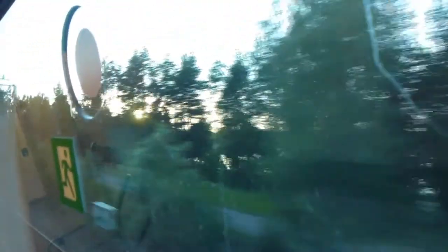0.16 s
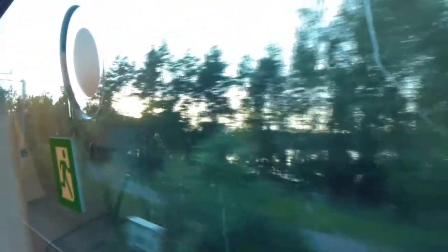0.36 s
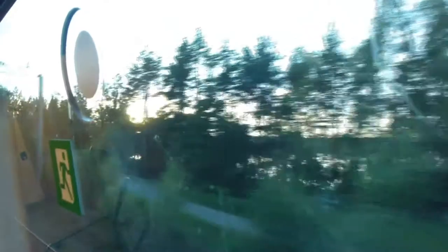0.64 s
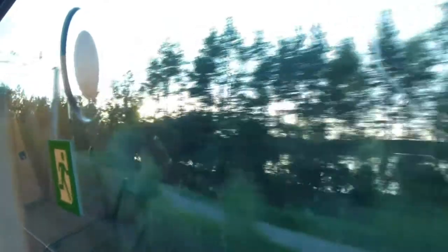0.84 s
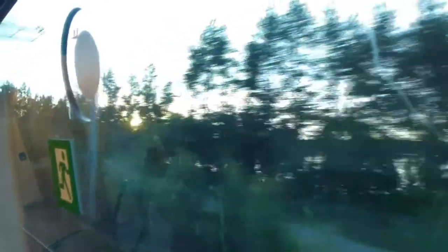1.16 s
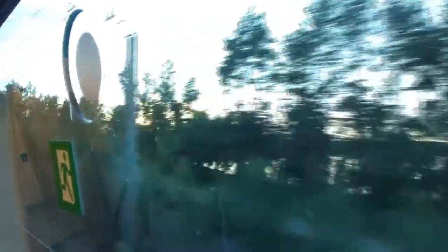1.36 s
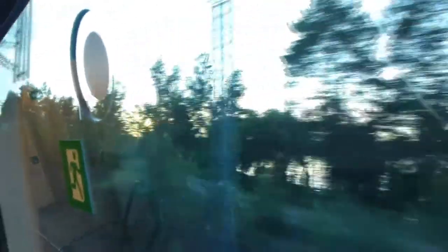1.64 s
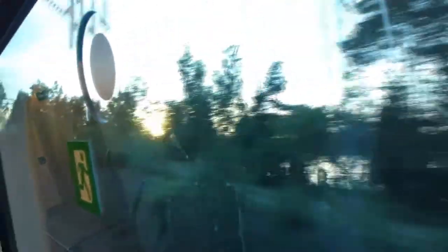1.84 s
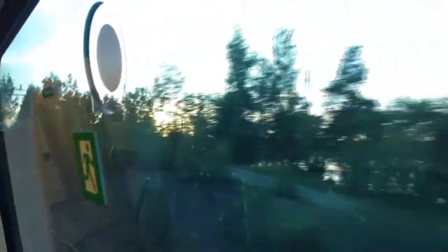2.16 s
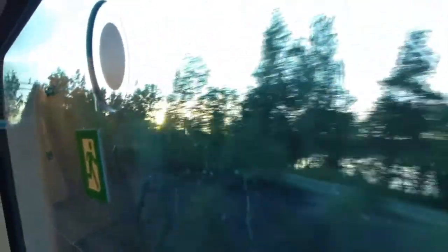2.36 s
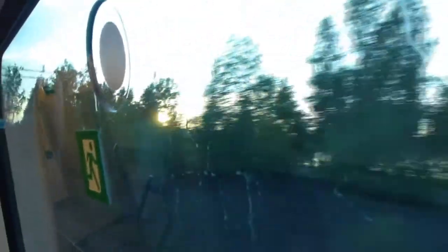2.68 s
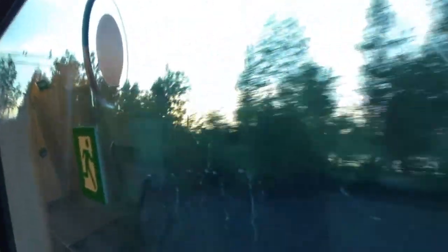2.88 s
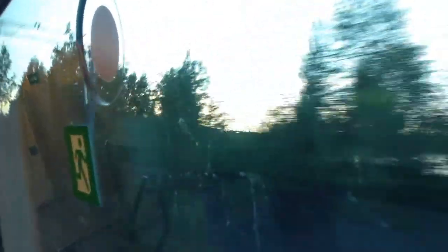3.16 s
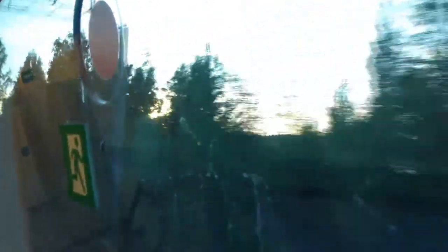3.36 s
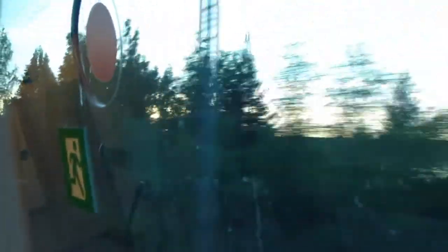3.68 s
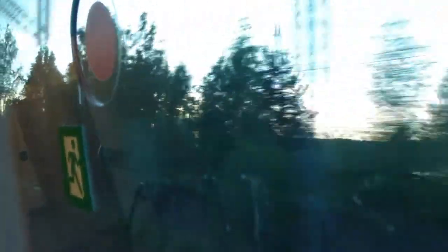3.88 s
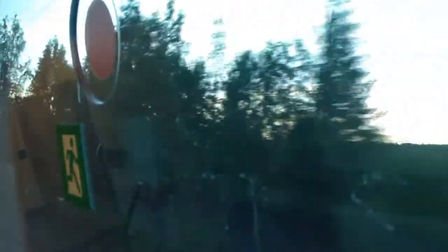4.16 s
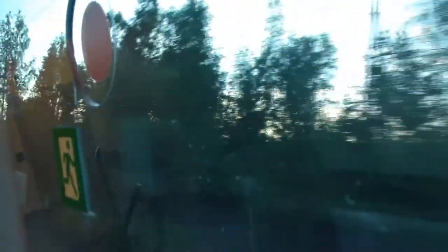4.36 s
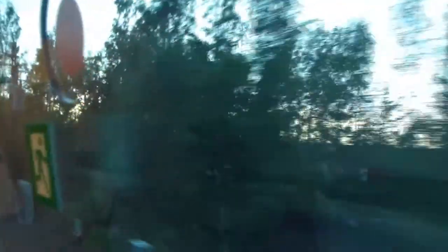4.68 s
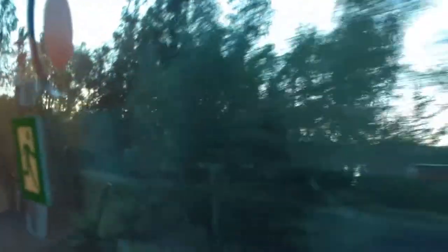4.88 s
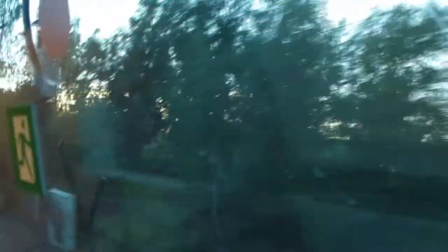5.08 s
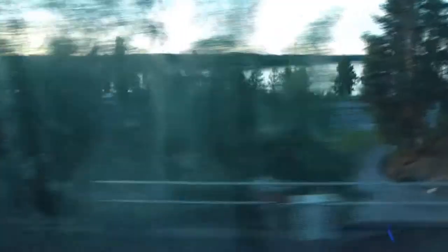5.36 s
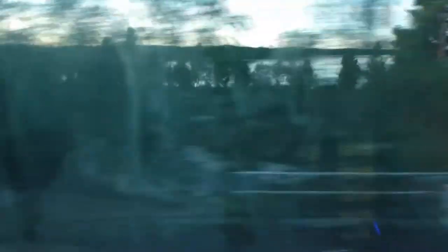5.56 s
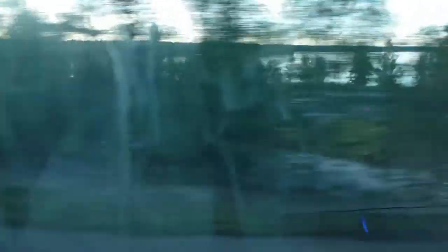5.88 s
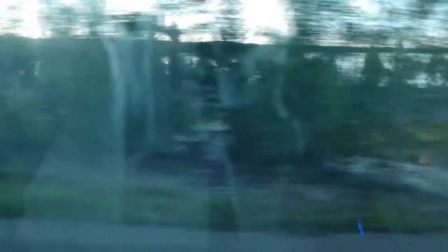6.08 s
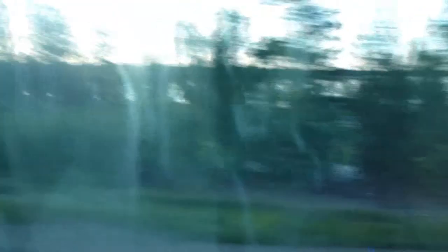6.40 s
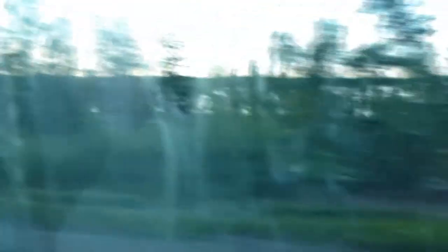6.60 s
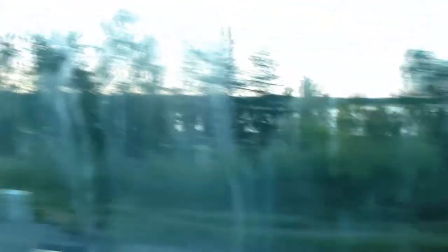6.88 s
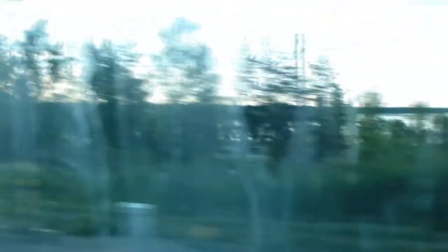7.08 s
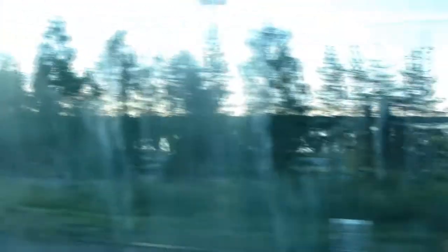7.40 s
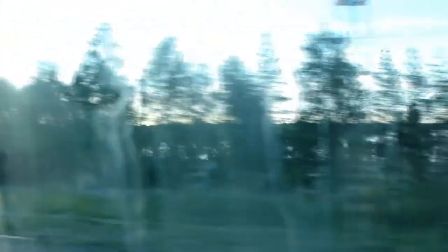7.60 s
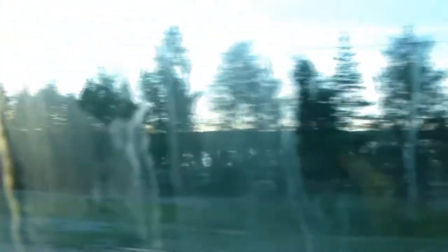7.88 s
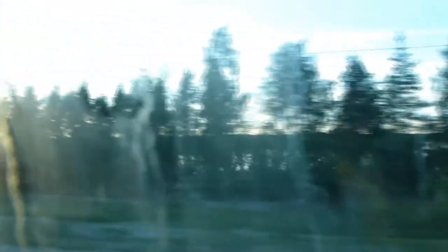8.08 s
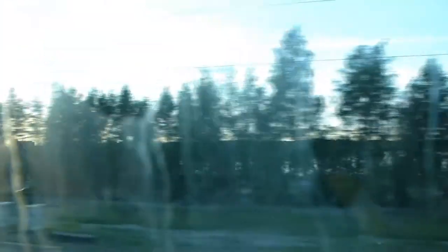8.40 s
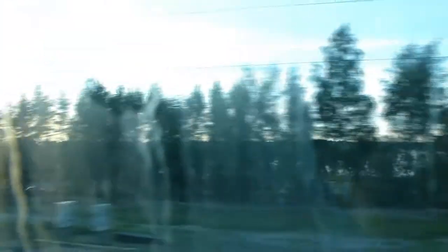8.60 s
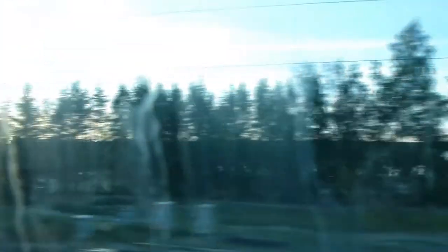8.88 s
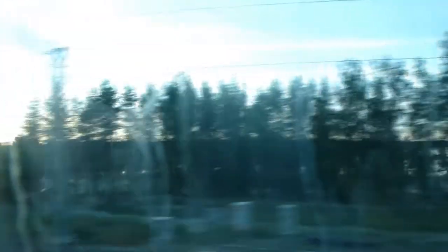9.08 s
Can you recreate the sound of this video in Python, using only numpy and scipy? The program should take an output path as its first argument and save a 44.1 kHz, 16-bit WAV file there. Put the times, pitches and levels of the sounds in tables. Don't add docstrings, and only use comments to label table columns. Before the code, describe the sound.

A small handheld stereo camera in a train cabin picks up dull rolling rumble, wavering with bumps, and hissing window seals. Thin wheel hums swell briefly; plastic clicks and soft fingertip taps occur very close. After about five seconds everything drops out for a quarter second, then the faster ride enters abruptly, with stronger rumble and air rush, smoother and almost free of handling noise.

```python
import sys
import numpy as np
from scipy import signal
from scipy.fft import rfft, irfft, next_fast_len
from scipy.io import wavfile
from scipy.ndimage import uniform_filter1d, map_coordinates

SR = 44100
rng = np.random.default_rng(int(sys.argv[2]) if len(sys.argv) > 2 else 0)


def wav_out(sig):
    wavfile.write(sys.argv[1], SR, np.round(np.clip(np.atleast_2d(sig).T, -1, 1) * 32767).astype(np.int16))


def boost(x):
    u = np.asarray(x, float) / 20
    return 10 ** u


N = 407925
TOP_HZ = 15780

# start in seconds, end in seconds.
STRETCHES = [
    (-1, 5.2935),
    (5.5212, 10),
]
# middle in seconds, half length in seconds,
# level change in dB.
SHADES = [(.02, .06, -4), (.87, 0.086, -2.5), (2.02, 0.072, -5.5), (3.09, 0.021, -12.5),
          (3.42, 0.024, -1.5), (3.61, 0.022, -3), (4.23, 0.029, -1.5), (4.38, 0.044, -6.5),
          (4.55, 0.07, -2), (4.85, .08, -2)]


def unit(x):
    return x / np.sqrt(np.mean(x ** 2) + 1e-20)


def along(points, hz):
    f, v = np.transpose(points)
    return np.interp(np.log(hz + 1), np.log(f + 1), v)


def curve_of(rows):
    s, v = np.transpose(rows)
    return np.interp(np.arange(N) / SR, s, v)


def share(curve, rows, part_followed):
    centre = np.mean([row[1] for row in rows])
    return centre + part_followed * (curve - centre)


def swells(rows):
    t = np.arange(0, N / SR, 1 / 500)
    total_db = sum(db * np.exp(-((t - s) / half) ** 2) for s, half, db in rows)
    return np.interp(np.arange(N) / SR, t, total_db)


def wobble(rate):
    return map_coordinates(rng.standard_normal(N // 100), [np.arange(N) * rate / SR], order=1)


def filtered(x, response):
    m = next_fast_len(x.shape[-1] + 8192)
    return irfft(rfft(x, m) * response(np.fft.rfftfreq(m, 1 / SR)), m)[..., :x.shape[-1]]


def modes(table, f):
    total = 0
    for k, (centre, wide, db) in enumerate(table):
        total = total + (-1) ** k * boost(db) * 1j * f * wide / (centre * centre - f * f + 1j * f * wide)
    return total


def rush(part, spectrum, lifts, lo_hz, hi_hz, patchy_db):
    # frequency in Hz, side minus mid in dB.
    alike = [
        [(60, -25), (95, -27.5), (150, -41.5), (240, -50), (380, -23.5), (600, -20), (950, -13), (1500, -2.5),
         (2380, -7.5), (3770, -0.5), (5980, -2.5), (9470, -1.5), (15000, 3)],
        [(60, -20), (95, -25), (150, -31), (240, -49), (380, -25), (600, -20.5), (950, -7), (1500, -4.5),
         (2380, -3.5), (3770, 0), (5980, -3.5), (9470, -0.5), (15000, 2)],
    ]
    start, stop = np.clip(np.round(np.array(STRETCHES[part]) * SR), 0, N).astype(int)
    z = signal.stft(rng.standard_normal((2, stop - start)), nperseg=1024)[2]
    field = uniform_filter1d(rng.standard_normal(z.shape[1:]), size=12, axis=0)
    field = uniform_filter1d(field, size=6, axis=1)
    pair = signal.istft(z * boost(patchy_db * unit(field)), nperseg=1024)[1][:, :stop - start]
    walls = rng.standard_normal(SR // 40)

    def colour(hz):
        db = along(spectrum, hz)
        db = db + sum(lift / (1 + (2 * (hz - c) / wide) ** 2) for c, wide, lift in lifts)
        db = db + 2.0 * np.interp(hz / 20, np.arange(len(walls)), walls) * np.clip(hz / 900, 0, 1)
        band = 1 / np.sqrt((1 + (lo_hz / (hz + 1)) ** 12) * (1 + (hz / hi_hz) ** 12))
        return (hz < TOP_HZ) * band * boost([db, db + along(alike[part], hz)])

    mid, side = filtered(pair, colour)
    power = uniform_filter1d(uniform_filter1d(mid ** 2, size=SR // 12), size=SR // 12)
    steady = np.sqrt(np.abs(power))
    return np.pad(np.array([mid + side, mid - side]) / steady, ((0, 0), (start, N - stop)))


def rolling(part):
    # frequency in Hz, level in dB per Hz.
    roll_tone = [
        [(15, -78.5), (25, -37.5), (48, -32.5), (67, -20.5), (97, -8), (191, -7.5), (257, 0), (426, -10.5),
         (563, -13), (798, -15.5), (870, -16), (949, -18.5), (1600, -20.5), (2080, -66), (3520, -120)],
        [(15, -84), (25, -37), (48, -38), (60, -28), (108, -12.5), (145, -15.5), (240, -1.5), (281, -6),
         (328, -7.5), (670, -11), (949, -15.5), (1170, -18.5), (1600, -20.5), (2080, -50), (3520, -120)],
    ]
    # frequency in Hz, width in Hz, lift in dB.
    cabin_modes = [(111.8, 4.5, 8), (173, 32, 3), (222.8, 6.3, 4.5), (251.3, 14, 3), (352, 110, 5.5),
                   (467.3, 12, 5), (705, 25, 0.5)]
    # time in seconds, level in dB.
    track = [
        [(0, -48), (.25, -42.5), (.9, -43.5), (1.15, -42.5), (1.5, -42.5), (1.87, -40), (2.08, -47.5),
         (2.75, -42.5), (3.2, -43), (3.6, -46.5), (4.2, -45.5), (4.7, -45), (5.28, -43)],
        [(5.52, -36.5), (6.15, -36.5), (7.0, -38), (8.1, -36), (8.45, -37.5)],
    ]
    # middle in seconds,
    # half length in seconds, boom in dB, share reaching the rail (a ratio).
    jolts = [(.11, 0.06, 2.5, .3), (0.305, 0.035, 7.5, 1.1), (.37, .025, 4, .3), (0.418, 0.02, 7, 1.1),
             (.447, .01, 9, .5), (.474, .011, 11, .3), (.56, .03, 1, .2), (0.757, 0.024, 5, 0.24),
             (1.294, 0.096, 3.5, .1), (1.87, 0.39, 0.5, .1), (2.43, .04, 3.5, .1), (2.626, 0.023, 2.5, 0.2),
             (2.695, 0.033, -5, 0.37), (3.062, 0.024, 4.5, 0.98), (3.262, 0.026, 12, .05),
             (3.342, 0.05, 7, 0.26), (3.447, .03, 7.5, .4), (3.558, 0.049, 8.5, .1), (3.81, 0.084, 5, 0.4),
             (4.007, 0.026, 2.5, .1), (4.195, 0.066, 5, .05), (4.6, 0.24, -3, .1), (4.9, .07, 2.5, 0.44),
             (5.216, 0.061, 3, .5), (5.685, .08, 2.5, .1), (5.818, 0.1, -4, 0.18), (6.213, 0.078, 2.5, .05),
             (6.323, 0.069, -2.5, .05), (6.52, 0.035, 1.5, .1), (6.987, 0.043, 5, .05),
             (7.716, 0.052, 3.5, 0.22), (7.87, 0.083, -3, .05), (8.155, 0.024, 5.5, 0.64),
             (8.31, 0.17, -2, .3), (8.81, 0.11, 1.5, 0.37)]
    # middle in seconds, lift in dB.
    thuds = [(.43, 7), (.6, 6.5), (.76, 3), (.97, -0.5), (1.32, -5), (2.0, 7.5), (2.49, 4.5), (2.93, 1),
             (3.05, 5), (3.2, 7), (3.27, -6), (3.34, 11), (3.57, 4.5), (3.69, -2), (3.93, 6), (4.17, 6),
             (4.89, 4), (5.12, 4.5), (5.28, 7), (5.69, -3), (5.83, 2), (6.32, 1), (6.98, -3), (7.22, -3),
             (7.86, -5), (8.15, 2.5)]
    # middle in seconds, half length in seconds, lift in dB.
    rail_rings = [(1.02, 0.15, 7), (1.82, .05, 4), (3.5, 0.068, 4), (3.8, 0.13, 8), (5.2, 0.073, 4),
                  (7.0, .08, 4)]

    def noise(lo_hz, hi_hz):
        return rush(part, roll_tone[part], cabin_modes, lo_hz, hi_hz, patchy_db=[1.5, 1.1][part])

    track_db = curve_of(track[part])
    sway_db = [1.2, .6][part] * wobble(14) + 0.21 * swells(SHADES)

    under_db = share(track_db, track[part], 0.18) + [-4, -11][part]
    under_db = under_db + swells([(s, 0.07, db) for s, db in thuds])
    under = boost(under_db + sway_db) * noise(12, 197.0)

    cabin_db = share(track_db, track[part], 0.63) + [3.5, 0][part]
    cabin_db = cabin_db + swells([row[:3] for row in jolts])
    cabin = boost(cabin_db + sway_db) * noise(207, 487)

    rail = noise(462, 1084)
    shaken = boost(swells([(s, half, db * reach) for s, half, db, reach in jolts])) - 1
    rail = rail + shaken * filtered(rail, lambda hz: 1 / (1 + (hz / 860) ** 10))
    ringing = filtered(rail, lambda hz: modes([(1060, 160, 0)], hz))
    rail = rail + (boost(swells(rail_rings)) - 1) * ringing
    return under + cabin + boost(track_db + [-0.5, -1][part] + sway_db) * rail


def air(part):
    # frequency in Hz, level in dB per Hz.
    air_tone = [
        [(710, -30), (1200, -1), (1320, -1.5), (1440, -8), (2080, -7), (2260, -6), (2720, -8.5), (3130, -10),
         (3440, -10.5), (4560, -11), (5900, -13.5), (8320, -9), (15700, -24.5)],
        [(710, -36), (1200, 1.5), (1600, 0.5), (1990, 4), (2520, -3.5), (3230, -5.5), (3600, -4), (5590, -11),
         (6500, -15), (7310, -13), (8780, -14), (9670, -18.5), (15700, -30.5)],
    ]
    # frequency in Hz, width in Hz, lift in dB.
    seal_modes = [(1920, 430, 1.5), (2180, 170, 0.72), (3190, 180, 1.3), (4580, 25, 5), (4690, 38, 6.4),
                  (5400, 200, 0.83), (7400, 500, 2.6), (8600, 700, 1.2)]
    # time in seconds, level in dB.
    flow = [
        [(0, -65), (.35, -59.5), (.95, -62), (1.3, -59.5), (1.75, -57.5), (2.1, -60), (2.85, -57), (3.3, -58.5),
         (3.5, -65), (4.0, -60), (4.55, -62), (5.0, -59.5), (5.28, -57.5)],
        [(5.52, -52), (6.4, -52), (7.4, -52), (8.0, -50.5), (8.5, -52)],
    ]
    # middle in seconds, half length in seconds, lift in dB.
    gust_rows = [(.39, 0.045, 3.5), (.74, 0.057, 4), (.94, 0.035, 4.5), (1.16, 0.16, 2.5), (1.82, 0.054, 5),
                 (2.84, 0.037, 1.5), (3.0, .04, 1), (3.55, 0.043, 3), (3.78, 0.092, 5), (4.13, 0.054, 0.5),
                 (4.46, 0.019, 5.5), (4.64, 0.048, 2.5), (5.02, 0.04, 2.5), (5.53, 0.017, 2.5),
                 (6.07, .1, 2), (7.0, 0.15, 0.5), (7.68, 0.041, 1.5), (7.99, 0.11, 2.5), (9.22, 0.14, 2.5)]
    # middle in seconds, half length in seconds,
    # lift in dB.
    puffs = [(.74, .07, 8), (4.46, .04, 3), (4.62, .025, 4), (6.1, .08, 3.5), (7.71, .04, 5), (8.0, .12, 3),
             (9.2, .1, 2.5)]

    def noise(lo_hz, hi_hz):
        return rush(part, air_tone[part], seal_modes, lo_hz, hi_hz, patchy_db=[1.1, .8][part])

    flow_db = curve_of(flow[part])
    gusts_db = swells(gust_rows)
    flutter_db = [.8, .4][part] * wobble(16) + swells(SHADES)
    rush_db = share(flow_db, flow[part], 0.48) + [6, 3][part] + gusts_db + flutter_db
    fizz_db = flow_db + [0.17, 0.83][part] * gusts_db + flutter_db
    sheen = boost([-9.5, -9][part] + swells(puffs)) * noise(10500, 21000)
    fizz = noise(5400, 11600) + sheen
    return boost(rush_db) * noise(1324, 6070) + boost(fizz_db) * fizz


def singing():
    wheel_hz = (851, 679, 258)
    # start in seconds, length in seconds, level in dB.
    songs = [
        [(.1, 0.2, -69), (.4, 0.12, -51), (.92, 0.11, -55), (1.14, 0.092, -48), (1.3, 0.12, -64),
         (1.67, 0.034, -50), (1.83, 0.098, -47.5), (2.42, 0.18, -64), (2.7, 0.1, -49), (2.92, 0.4, -59),
         (3.42, 0.22, -64), (3.74, 0.13, -46), (3.95, 0.24, -57), (4.22, 0.39, -70), (4.99, 0.26, -48.5)],
        [(.28, 0.033, -59), (1.74, 0.056, -58), (2.52, 0.14, -61), (2.74, .6, -60), (3.47, 0.32, -54),
         (3.92, 0.18, -59), (4.28, 0.23, -55.5), (4.71, 0.12, -50.5), (5.0, 0.32, -58)],
        [(1.02, 0.35, -45), (1.74, 0.46, -44.5), (2.56, 0.079, -38.5), (3.52, 0.14, -41.5), (4.14, .05, -39),
         (.12, 0.4, -64)],
    ]
    edge_s, hum_db = .065, -60.5
    t = np.arange(N) / SR
    total = 0
    for hz, spells in zip(wheel_hz, songs):
        loudness = boost(hum_db)
        for s, long, db in spells:
            knots = [s - edge_s, s, s + long, s + long + edge_s]
            loudness = loudness + boost(db) * np.interp(t, knots, [0, 1, 1, 0]) ** 2
        unsteady = boost(0.5 + 1.9 * wobble(22))
        tone = np.sqrt(2) * np.sin(2 * np.pi * hz * t + .85 * wobble(22))
        total = total + loudness * unsteady * tone
    return total * boost([[.6], [-.6]])


def creaks():
    # start in seconds, peak in dB, treble share in dB,
    # time to fall 60 dB in seconds, top frequency in Hz that the soft skin lets through.
    slip_rows = [(1.421, -34.5, -1.5, 0.008, 9000), (1.4195, -29, -4, .014, 14000),
                 (1.4268, -19.5, -6.5, .014, 13000), (1.4398, -32.5, -3, .005, 7000),
                 (1.7052, -30, -19.5, .008, 3000), (1.7823, -29, -15, .008, 2800),
                 (1.7843, -26, 6.5, 0.006, 16000), (1.8064, -37, -10, .004, 4500),
                 (1.824, -32, 8, 0.12, 16000), (1.8354, -35, -5, .03, 6000),
                 (1.8418, -27.5, -9.5, 0.011, 4500), (1.8445, -27, -12, .012, 4500),
                 (1.851, -31.5, -9.5, 0.043, 5500), (1.8666, -13.5, 1, .0025, 5800),
                 (2.949, -30, -3.5, .004, 6500), (3.0015, -24.5, -1.5, 0.003, 5500),
                 (3.008, -36, -15, .012, 2200), (3.0788, -24, -6, 0.0084, 6500),
                 (3.083, -19, -14, 0.01, 5000), (3.084, -26, -12, 0.011, 6000),
                 (3.0868, -17, -8, 0.012, 7000), (3.0891, -4.5, -1, .004, 15000),
                 (3.0895, -5.5, -3, .003, 12000), (3.09, -6.5, -3, .005, 13000),
                 (3.093, -27, 6, 0.0099, 12000), (3.1228, -16.5, 12.5, 0.013, 8500),
                 (3.1305, -33, 5, .01, 9000), (3.2263, -34, 2, .006, 9000), (4.618, -36, 13, .04, 16000),
                 (7.011, -24, 18, 0.006, 9500), (7.981, -27, -13, 0.01, 5000)]
    # frequency in Hz, width in Hz, level in dB.
    casing = [
        [(1400, 800, -4.5), (2150, 700, -1), (3600, 1900, -3), (2290, 45, -6)],
        [(6340, 1900, 0.5), (9000, 1800, -4), (13000, 3500, 1)],
    ]
    # frequency in Hz, width in Hz, level in dB.
    hollow = [(1050, 460, -5), (1790, 460, 6), (4500, 2600, -6.5), (6900, 310, -17.5)]
    out, t = np.zeros((2, N + SR)), np.arange(SR // 20) / SR

    def bright(f):
        return modes(casing[1], f) - .25j * f / (2500 + 1j * f)

    for s, db, treble_db, t60, top_hz in slip_rows:
        slips = rng.standard_normal((2, len(t))) * boost(-60 * t / t60)
        slips[:, 0] = 3

        def shell(f):
            breathe = modes(hollow, f) / (1 + 1j * f / 7000) - boost(treble_db - 3.5) * bright(f)
            flex = modes(casing[0], f) / (1 + 1j * f / 5000) - boost(treble_db) * bright(f)
            soft_skin = 1 / (1 + np.sqrt(2) * 1j * f / top_hz - (f / top_hz) ** 2) ** 2
            return np.array([breathe, flex]) * soft_skin

        mid, side = filtered(slips, shell)
        mid = 0.51 * mid / np.abs(mid).max()
        side = 0.83 * side / np.abs(side).max()
        gain = boost(db + np.array([[-1.2], [1.2]]) / 2)
        out[:, round(s * SR):][:, :len(t)] += gain * np.array([mid - side, mid + side])
    return out[:, :N]


def taps():
    # start in seconds, peak in dB, rocking frequency in Hz.
    tap_rows = [(.175, -44, 503), (.756, -44, 500), (1.987, -26, 650), (1.990, -41, 500), (2.003, -40, 750),
                (3.3875, -25, 700), (3.3908, -24, 500), (3.400, -37, 450), (3.590, -33.5, 600),
                (3.592, -34, 400), (3.596, -44, 500), (4.324, -37, 500), (4.327, -30, 450),
                (4.330, -42, 600)]
    out, t = np.zeros(N + SR), np.arange(SR // 50) / SR
    for s, db, hz in tap_rows:
        fading = boost(db + 11.5 - 34.0 * hz * t)
        soft_start = 1 - np.exp(-t / 0.00024)
        out[round(s * SR):][:len(t)] -= fading * np.sin(2 * np.pi * hz * t) * soft_start
    rocking = filtered(out[:N], lambda f: (1j * f / (260 + 1j * f)) ** 2)
    return np.array([[1], [-1]]) * rocking


def scene():
    # frequency in Hz, left minus right in dB.
    balance = [(60, -5), (180, -0.5), (550, 0.5), (1650, 1.5), (4970, 2), (15000, 0)]
    t = np.arange(N) / SR

    def gate(part, fall_s):
        start_s, end_s = STRETCHES[part]
        return np.clip(np.minimum((t - start_s) / .0004, (end_s - t) / fall_s), 0, 1)

    def lean(hz):
        return boost(along(balance, hz) * np.clip(hz / 800, 0, 1) * [[.5], [-.5]])

    first = gate(0, .0045) * (rolling(0) + singing()) + gate(0, .0006) * air(0)
    second = gate(1, 0.9) * (rolling(1) + air(1))
    return filtered(first + second, lean) + creaks() + taps()


def band_limit(x):
    return signal.sosfilt(signal.butter(12, 16690, fs=SR, output="sos"), x)


def record(dry):
    mix = filtered(dry, lambda hz: hz < TOP_HZ)
    return band_limit(mix)


dry = scene()
out = record(dry)
wav_out(out)
```